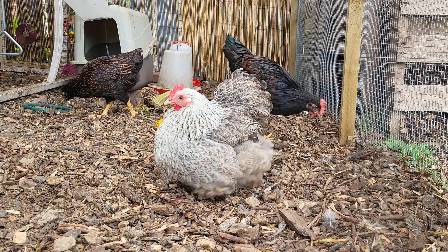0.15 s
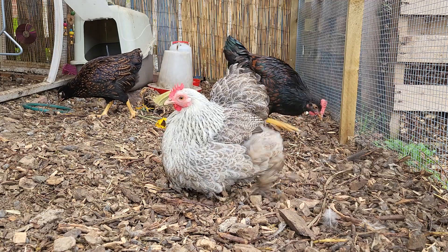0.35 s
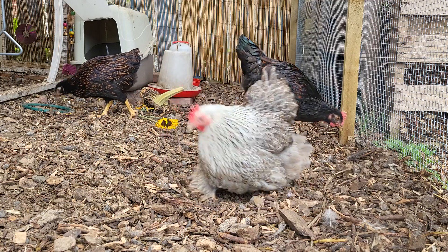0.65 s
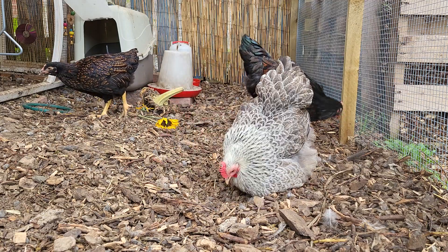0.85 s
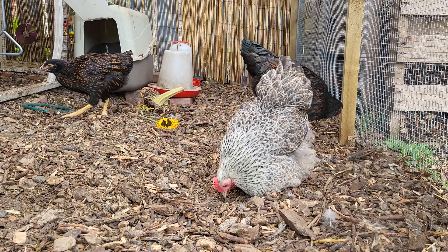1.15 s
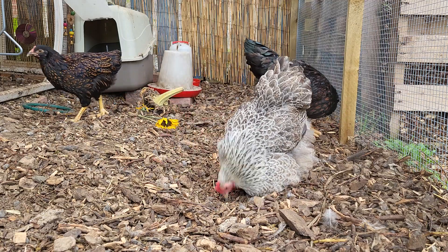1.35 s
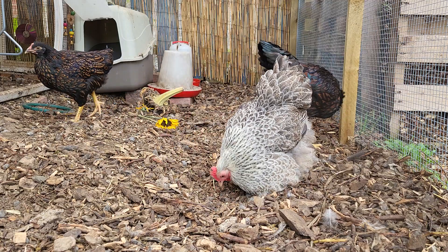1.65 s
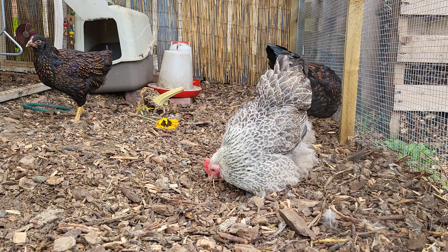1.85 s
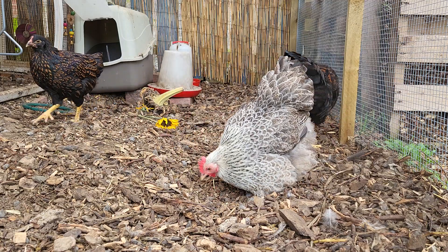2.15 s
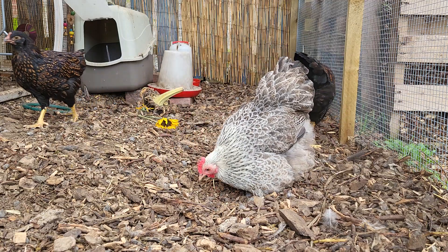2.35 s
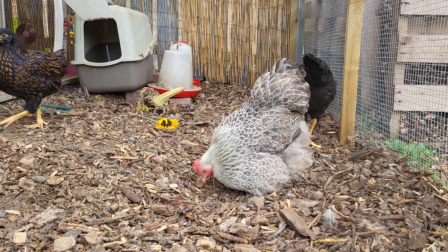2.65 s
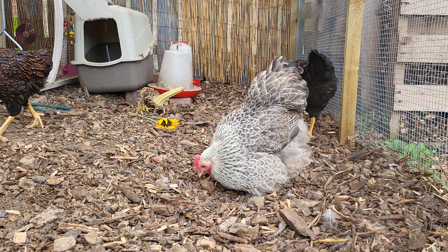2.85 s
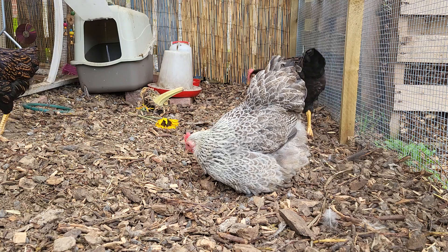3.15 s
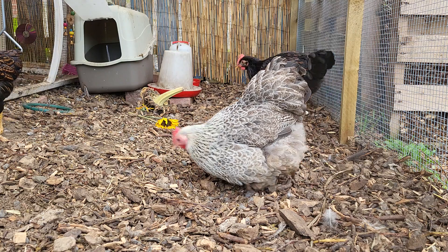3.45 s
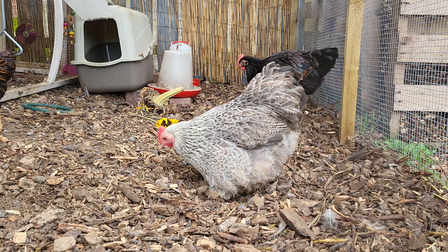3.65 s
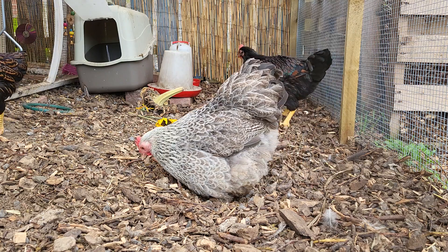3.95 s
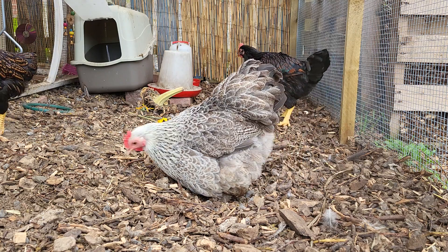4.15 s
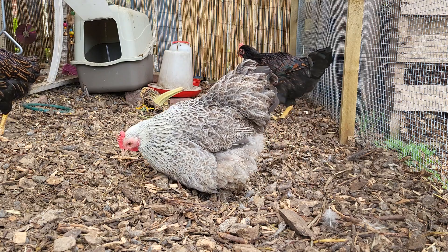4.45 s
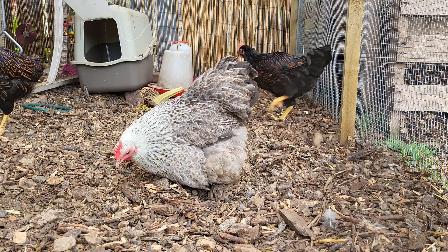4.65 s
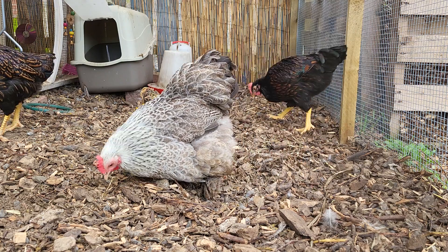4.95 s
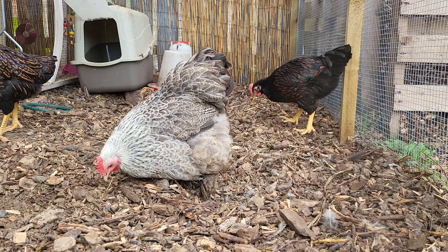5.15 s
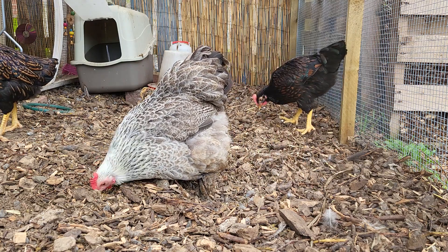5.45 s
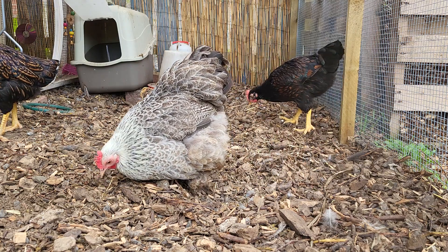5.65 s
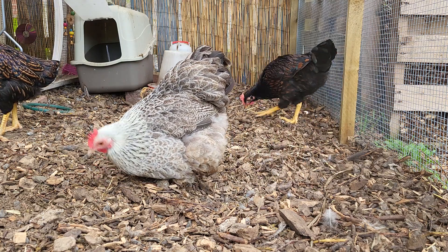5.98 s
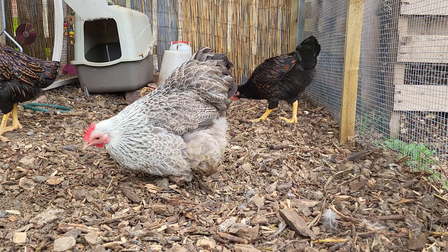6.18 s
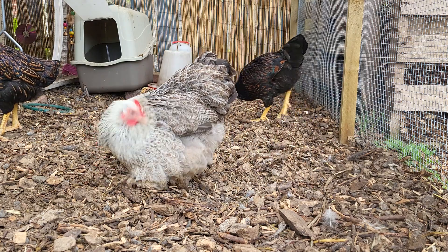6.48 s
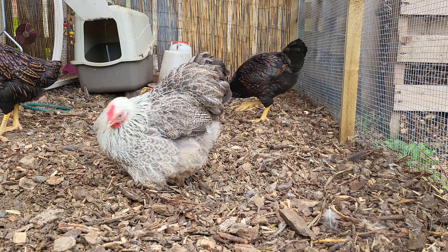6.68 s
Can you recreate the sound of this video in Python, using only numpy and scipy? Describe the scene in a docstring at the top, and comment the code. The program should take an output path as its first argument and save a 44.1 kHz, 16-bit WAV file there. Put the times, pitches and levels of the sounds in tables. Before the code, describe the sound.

Outdoors, a phone a metre or two from hens picks up crisp, bright wood-chip rustling and snapping just after the start. A calmer stretch follows with tiny soft clucks and thin shuffling off to the right. The loudest moment is a sudden claw scrape against wood with a deep bump, followed by scattered steps and scratches. Soft hum and far traffic rumble continue throughout.

```python
"""A steady transformer hum over distant traffic comes first, with a hen shuffling lightly further off to the right.
Then hens step and scratch in dry wood-chip litter a metre or two from a phone, and cluck softly now and then.
Coloured random clicks make the rustle, scrape and thud; short rings make the snapping chips; a kick shakes the run.
Sine waves make the hum and the clucks."""
import sys
import numpy as np
from scipy import signal
from scipy.fft import rfft, irfft, next_fast_len
from scipy.io import wavfile
from scipy.ndimage import uniform_filter1d

SR = 44100
rng = np.random.default_rng(int(sys.argv[2]) if len(sys.argv) > 2 else 0)


def master(y):
    """Save y as 16-bit WAV."""
    cut = np.clip(np.atleast_2d(y).T, -1, 1)
    pcm = np.round(cut * 32767)  # scale
    wavfile.write(sys.argv[1], SR, pcm.astype(np.int16))


def makeup_ratio(level_db):
    """Linear amplitude ratio for a level in decibels (20 dB per factor of ten)."""
    decades = np.asarray(level_db, float) / 20
    return 10 ** decades


N = 300757  # length in samples


def colour(x, shape):
    """Give a noise a spectrum of (f/Hz, level/dB) points, falling away outside them."""
    hz, db = np.transpose(shape)
    size = next_fast_len(N)
    log_f = np.log(np.arange(size // 2 + 1) * SR / size + 1)
    response = makeup_ratio(np.interp(log_f, np.log(hz), db, -80, -80))
    return irfft(rfft(x, size) * response, size)[..., :N]


def unit(x, lo_hz, hi_hz):
    """Scale two channels so that their mean has rms 1 in a band."""
    sos = signal.butter(4, [lo_hz, hi_hz], "band", fs=SR, output="sos")
    return x / signal.sosfilt(sos, x.mean(axis=0)).std()


def pan(db):
    """Left and right gains for a left minus right level difference."""
    return makeup_ratio(np.array([db / 2, -db / 2]))


def walk(rate):
    """Random levels held 1 / rate s and smoothed twice; spread near 1."""
    k = int(SR / rate)
    held = np.repeat(rng.standard_normal(N // k + 1), k)
    return 1.55 * uniform_filter1d(uniform_filter1d(held, k), k)[:N]


def grains(rate, spread_db, alike, lag):
    """Scattered clicks of uneven, bounded size, rate a second; both ports share some, the left lag samples late."""
    size = makeup_ratio(spread_db * np.minimum(rng.exponential(size=(3, N)), 4))
    clicks = (rng.random((3, N)) < rate / SR) * rng.standard_normal((3, N))
    both, left, right = clicks * size
    own = np.sqrt(1 - alike ** 2)
    return np.array([alike * np.roll(both, lag) + own * left, alike * both + own * right])


def power(s, db, rise_s, fall_s):
    """Power of each event, a row of millisecond values: straight rise and fall in dB, each time given per 20 dB."""
    late = np.arange(N * 1000 // SR + 2) / 1000 - np.reshape(s, (-1, 1))
    # a fall of zero or less ends the event within milliseconds
    fall_s = np.maximum(np.reshape(fall_s, (-1, 1)), 1e-3)
    below = np.where(late < 0, -late / rise_s, late / fall_s)
    return makeup_ratio(2 * (np.reshape(db, (-1, 1)) - 20 * np.minimum(below, 8)))


def gain(*powers):
    """Unrelated events add in power; one gain a sample."""
    total = np.sqrt(sum(p.sum(axis=0) for p in powers))
    return np.interp(np.arange(N) / SR, np.arange(len(total)) / 1000, total)


# transformer hum, mains harmonics: f/Hz, rms level/dB
HUM_HARMONICS = [(100, -44.5), (200, -63), (300, -75), (400, -75.5)]


def hum():
    """Transformer: mains harmonics as sines that waver slightly in level and phase."""
    t = np.arange(N) / SR
    total = np.zeros(N)
    for hz, db in HUM_HARMONICS:
        level = np.sqrt(2) * makeup_ratio(db + 0.86 * walk(4.0))
        total += level * np.sin(2 * np.pi * (hz * t + rng.random()) + 0.1 * walk(8.3))
    return total


# spectrum of far traffic rumble: f/Hz, level/dB per Hz
RUMBLE_SPECTRUM = [(15, -22), (25, -11.5), (40, -9), (60, -2), (80, -1), (120, -10.5), (160, -14),
                   (240, -19), (300, -36)]
# spectrum of far tyre roar: f/Hz, level/dB per Hz
ROAR_SPECTRUM = [(140, -33.5), (230, -8), (305, -10), (365, -13.5), (402, -15), (476, -17), (609, -18),
                 (756, -20), (922, -15.5), (1050, -17.5), (1150, -20.5), (2200, -37), (2860, -63.5),
                 (4840, -120)]
# spectrum of the smooth background hiss: f/Hz, level/dB per Hz
HISS_SPECTRUM = [(1290, -30), (2200, -2.5), (2510, -3.5), (3460, -5), (3730, -6.5), (7160, -9), (9020, -11),
                 (13000, -8), (15800, -6)]


def distance():
    """Dense noise: traffic rumble nearly alike at both ports, tyre roar and a smooth hiss that are not."""
    rumble = unit(colour(grains(SR, 0, 0.97, lag=0), RUMBLE_SPECTRUM), 18, 300)
    roar = unit(colour(grains(SR, 0, 0.44, lag=0), ROAR_SPECTRUM), 270, 2200)
    hiss = unit(colour(grains(SR, 0, .05, lag=0), HISS_SPECTRUM), 1900, 15000)
    rumble = rumble * makeup_ratio(-53.5 + 2.2 * walk(3.03)) * pan(1.5)[:, None]
    roar = roar * makeup_ratio(-70 + 1.1 * walk(8.9))
    hiss = hiss * makeup_ratio(-83.5 + 0.44 * walk(5.1))
    return rumble + roar + hiss


# spectrum of chips heard from further off: f/Hz, level/dB per Hz
FAR_CHIP_SPECTRUM = [(2350, -37), (4000, -10), (6450, -3), (7570, 1.5), (8740, -11.5), (15200, -9.5),
                     (15800, -4)]
# a hen further off, shuffling lightly: t/s of peak, level/dB, t/s to fall 20 dB
FAR_STEPS = [(0.044, -73.5, 0.7), (.1, -85, 2), (.185, -68, .03), (1.0, -100, 5), (4.19, -94, -1),
             (4.495, -80, 1.7), (5.35, -80, -0.05), (1.316, -81, 0.3), (1.41, -81.5, 0.25),
             (1.57, -76.5, .17), (1.8, -88.5, 0.4), (1.944, -76.5, .14), (2.26, -82, .5), (2.374, -77, 0),
             (3.1, -80.5, .4), (3.352, -81, 0.8), (3.42, -86, .9), (4.336, -82, .1), (5.64, -76.5, 0.1),
             (5.802, -79.5, 0.37), (5.99, -80.5, 0.7), (6.203, -77.5, 0.2), (6.45, -90.5, 1.37),
             (6.62, -76.5, 0.1), (6.7, -83.5, 0.2)]


def shuffle():
    """Far hen, to the right: distance leaves only a thin bright whisper of the chips."""
    far = unit(colour(grains(12000, 1.7, 0.31, lag=12), FAR_CHIP_SPECTRUM), 4300, 10500)
    s, db, fall_s = np.transpose(FAR_STEPS)
    return far * gain(power(s, db, 0.083, fall_s)) * pan(-5)[:, None]


def loose_snaps():
    """Chips that snap at random, each as loud as the rustle around it allows and with a pitch of its own."""
    when, size, pitch, side = rng.random((600, 4)).T
    rustle_db = 20 * np.log10(footwork()[0][(when * N).astype(int)])
    # above -52 dB a louder rustle brings no louder snaps
    db = np.minimum(rustle_db, -52) + 11 - 3 * np.log(size + .05)
    ring_hz = 3500 * (9000 / 3500) ** pitch
    return np.transpose([when * N / SR, db, -5 * side, ring_hz])


# single chips snapping near the phone: t/s, level/dB, left minus right level/dB, ring f/Hz
SINGLE_SNAPS = [(0.0423, -52, -5.0, 6790), (0.1421, -55, -5.0, 6200), (0.166, -41, -5.5, 7360),
                (0.2543, -47, -4.5, 8330), (0.2763, -47, -3.0, 6610), (0.3536, -35, -1.0, 7680),
                (0.4075, -34, -2.5, 4830), (0.4284, -36, -2.5, 6990), (0.4524, -36, -2.0, 7850),
                (0.4694, -38, -4.0, 7250), (0.5501, -34, -3.0, 5350), (0.5586, -38, -2.0, 6730),
                (0.5881, -40, 0.0, 7830), (0.6739, -28, -3.0, 6780), (0.7502, -33, -2.5, 5070),
                (0.7846, -36, -1.0, 7200), (0.7974, -37, -2.0, 7020), (0.8204, -37, -1.0, 7430),
                (2.688, -51, 0, 2100), (2.6958, -49, -2.5, 5560), (2.733, -52, 0, 2300),
                (2.741, -54, 0, 2400), (2.7781, -44, -3.0, 5990), (3.3508, -60, -7.0, 6720),
                (3.5623, -42, -1.5, 7360), (3.6007, -30, -2.5, 6610), (3.9165, -40, -2.5, 6780),
                (4.5401, -44, -3.5, 7060), (4.5715, -38, -5.0, 7260), (4.8894, -41, -2.0, 6080),
                (5.0274, -39, -5.0, 5650), (5.0345, -32, 0.0, 6810), (5.1028, -49, -2.5, 3020),
                (5.1362, -40, -2.0, 4020), (5.6381, -59, -4.0, 7250), (5.8027, -57, -6.5, 6960)]


def snaps(ring_cycles=1.5, tail_s=.002, tail_db=-22, lag=6):
    """A click that rings a few cycles and leaves a short tail of splinters near the same pitch."""
    out, t = np.zeros((2, N + 2048)), np.arange(512) / SR
    rows = np.vstack([SINGLE_SNAPS, loose_snaps()])
    chance = rng.standard_normal((len(rows), len(t)))
    for (s, db, pan_db, hz), noise in zip(rows, chance):
        decay = np.exp(-t * hz / ring_cycles)
        attack = 1 - np.exp(-t / .00005)
        ring = np.sin(2 * np.pi * hz * t) * decay * attack
        splinters = np.convolve(noise * np.exp(-t / tail_s), ring * np.exp(-t / .0001))[:len(t)]
        snap = ring / np.abs(ring).max() + makeup_ratio(tail_db) * splinters
        for channel, share in enumerate(pan(pan_db)):
            i = int(s * SR) + (lag if channel == 0 else 0)  # the left port hears it lag samples late
            out[channel, i:i + len(t)] += makeup_ratio(db) * share * snap
    return out[:, :N]


# feet landing on the chips, a sudden start:
# t/s, chips level/dB, t/s to fall 20 dB, claws level/dB, left minus right level/dB
FOOT_LANDINGS = [(.278, -67, 0.3, -90, -2), (.628, -55.5, 0.21, -66.5, -1), (3.597, -45.5, .2, -62.5, 1.5),
                 (3.84, -50, 0.06, -54.5, 2), (3.913, -53.5, 0.13, -57.5, -1), (4.54, -61.5, 0.42, -72, -3),
                 (.408, -52.5, 0.32, -66.5, -2), (.55, -56, 0.03, -77, -2), (0.675, -52.5, 0.08, -67, 0),
                 (.785, -59.5, 0.1359, -67, 3), (2.728, -71, 0.13, -73, 5), (2.78, -70.5, 0.2, -94, -2),
                 (3.704, -36, 0.08, -69, -8), (4.101, -65, 0.09, -80.5, -2), (4.803, -42.5, .06, -52, 0),
                 (5.032, -49, .06, -62.5, 0.5)]
# feet pushed through the chips, swelling to a peak:
# t/s of peak, chips level/dB, t/s to fall 20 dB, claws level/dB, left minus right level/dB
FOOT_DRAGS = [(0.351, -53.5, 0.3059, -65.5, 0), (.46, -61, 0.22, -85, -2), (.59, -56.5, 0.0644, -72, -1),
              (.735, -74, .1, -76, 0), (0.818, -53.5, 0.0758, -67, -0.5), (2.701, -66, 0.14, -70, -1),
              (3.57, -57, .2, -74, 0), (3.633, -48, 0.1, -56.5, -7), (3.744, -37.5, 0.11, -38, -1.5),
              (3.962, -48, 0.03, -47, -3), (3.985, -56, .06, -56, -2), (4.055, -63.5, -0.14, -64.5, 3),
              (4.69, -56, .2, -68, -1), (4.584, -48, 0.3053, -66.5, -3), (4.626, -47, .1, -64, -0.5),
              (4.76, -58.5, 0.18, -69.5, -1), (4.909, -58, 0.1951, -62.5, -1), (4.99, -69, 0.2, -80, -3.5),
              (5.135, -60, .1, -63, -.5), (5.165, -60, .06, -64, -1), (5.21, -66.5, 0.11, -74, -1),
              (5.277, -67, 0.09, -75, 0)]
# claws striking hard against wood:
# t/s, chips level/dB, claws level/dB, hollow wood level/dB, share of woody knock (0-1)
CLAW_KICKS = [(3.711, -42, -31.5, -48.5, .24), (3.719, -40, -28, -42.5, .1), (3.73, -39, -22.5, -36.5, .1),
              (4.795, -42, -34, -52, 0.69)]


def footwork():
    """Gains of chips, rasp, knock, wood and bark, and of the two sides, out of steps, drags and kicks."""
    step, drag = np.transpose(FOOT_LANDINGS), np.transpose(FOOT_DRAGS)
    kick_s, thrown_db, strike_db, wood_db, share = np.transpose(CLAW_KICKS)
    share = share[:, None]
    chips, claws = [], []
    for (s, chip_db, fall_s, claw_db, _), rise_s in [(step, 0.0058), (drag, 0.046)]:
        settling = power(s, chip_db - 15, rise_s, .12)  # chips settling after every foot
        chips.append(power(s, chip_db, rise_s, fall_s) + settling)
        claws.append(power(s, claw_db, rise_s, 1.2 * fall_s))  # claws outlast the chips
    claws = np.vstack(claws)

    # a kick throws chips, then a weaker scatter settles slowly
    thrown = power(kick_s, thrown_db, .006, .06) + power(kick_s, thrown_db - 13, .006, 0.24)
    strike = power(kick_s, strike_db, .006, .085)
    tail = power(kick_s, strike_db - 19.5, .006, .17)
    loud = gain(*chips, thrown)

    # the loudest foot decides the side: a power-weighted mean of the left gains
    step_left = chips[0] * makeup_ratio(step[4])[:, None]
    drag_left = chips[1] * makeup_ratio(drag[4])[:, None]
    left = gain(step_left, drag_left, thrown * makeup_ratio(-3)) / loud

    knock_share = .15  # of the power of claws and kick tails
    scrape = (claws.sum(axis=0) + tail.sum(axis=0))[None]
    rasp = gain((1 - knock_share) * scrape, (1 - share) * strike)
    knock = gain(knock_share * scrape, share * strike)

    # a dull kick booms on in the hollow wood, a knocking one rattles loose bark, as the claws of every foot do
    boom = power(kick_s + .012, wood_db, .015, 0.31)
    wood = gain((1 - share) * boom)
    bark = gain(share * boom, claws * makeup_ratio(2 * -3.5))
    return loud, rasp, knock, wood, bark, np.array([left, 1 / left])


# spectrum of dry chips close by: f/Hz, level/dB per Hz
CHIP_SPECTRUM = [(880, -46.5), (1500, -11), (1740, -18), (2140, -9), (2490, -13.5), (2970, -2.5),
                 (7030, 3.5), (7840, -2.5), (9010, -9), (15100, -6), (16000, -11)]


def chips(chips_gain):
    """Chips rubbing: many small clicks hiss as they slide, fewer and more uneven ones tick."""
    slide = unit(colour(grains(20000, 1.45, 0.21, lag=9), CHIP_SPECTRUM), 2500, 14000)
    tick = unit(colour(grains(1200, 3, .7, lag=12), CHIP_SPECTRUM), 3000, 9000)
    tick_share = 0.29  # of the power
    rustle = np.sqrt(1 - tick_share) * slide + np.sqrt(tick_share) * tick
    return rustle * chips_gain * makeup_ratio(1.2 * walk(150))


# spectrum of claws rasping: f/Hz, level/dB per Hz
RASP_SPECTRUM = [(530, -43), (900, -16.5), (1200, -17.5), (1500, -10), (1970, -5), (2130, -6), (2590, -8.5),
                 (4500, -16), (5850, -43), (9900, -120)]
# spectrum of claws knocking: f/Hz, level/dB per Hz
KNOCK_SPECTRUM = [(650, -50.5), (1100, -19.5), (1310, -17.5), (1670, 1.5), (2060, -3.5), (2290, -13.5),
                  (2800, -10), (3640, -41), (6160, -120)]


def claws(rasp_gain, knock_gain):
    """Claws catching: dense clicks rasp, sparser ones knock."""
    rasp = unit(colour(grains(8000, 1.1, 0.4, lag=7), RASP_SPECTRUM), 1200, 3000)
    knock = unit(colour(grains(3000, 1.2, 0.61, lag=6), KNOCK_SPECTRUM), 1200, 3000)
    return (rasp * rasp_gain + knock * knock_gain) * makeup_ratio(0.61 * walk(90))


# spectrum of hollow wood booming: f/Hz, level/dB per Hz
WOOD_SPECTRUM = [(94, -40.5), (160, -10.5), (337, -5.5), (446, 0), (623, -3), (674, -11), (1100, -13.5),
                 (1300, -19), (1690, -46.5), (2860, -120)]
# spectrum of loose bark rattling: f/Hz, level/dB per Hz
BARK_SPECTRUM = [(140, -36.5), (230, -7), (368, -2.5), (405, -2), (770, -6), (1500, -8), (1950, -36),
                 (3300, -120)]


def shaken_wood(wood_gain, bark_gain):
    """Clicks coloured by the wood: the hollow parts boom, loose bark rattles."""
    wood = unit(colour(grains(8000, 1.0, 0.56, lag=3), WOOD_SPECTRUM), 320, 970)
    bark = unit(colour(grains(4000, 1.5, 0.69, lag=3), BARK_SPECTRUM), 230, 900)
    return wood * wood_gain + bark * bark_gain


# spectrum of ground and air thudding: f/Hz, level/dB per Hz
THUD_SPECTRUM = [(20, -13), (45, 0.5), (70, -2), (125, -1), (170, -17.5)]
# ground and air thudding at the microphone: t/s of peak, level/dB, t/s to fall 20 dB
GROUND_THUDS = [(.38, -57, .5), (.48, -60, -0.4), (2.348, -45, .25), (3.74, -49, .5), (3.812, -35, 0.09),
                (3.87, -41.5, 0.33), (4.03, -48, 0)]


def thuds():
    """Ground and air thudding at the microphone: deep noise that swells and fades."""
    thud = unit(colour(grains(8000, 1.1, .9, lag=0), THUD_SPECTRUM), 25, 70)
    s, db, fall_s = np.transpose(GROUND_THUDS)
    return thud * gain(power(s, db, 0.047, fall_s))


def litter():
    """Near feet: chips and claws on the side of the foot, wood and ground below them."""
    chips_gain, rasp_gain, knock_gain, wood_gain, bark_gain, side = footwork()
    high = chips(chips_gain) + claws(rasp_gain, knock_gain)
    low = shaken_wood(wood_gain, bark_gain) + thuds()
    # low sounds roll in lumps rather than fading evenly
    return high * side + low * makeup_ratio(1.5 * walk(40))


# soft clucks and squeaks: t/s, length t/s, pitch f/Hz, level/dB, roughness (no unit)
CLUCK_NOTES = [(2.0, .14, 560, -72, .9), (2.153, .035, 940, -60, .4), (2.158, .045, 1885, -66, .2),
               (2.192, .022, 935, -63, .6), (2.65, .035, 1775, -67, .15), (2.912, .06, 1055, -68, .3),
               (3.678, .02, 5800, -49, 1.8), (3.93, .06, 600, -53, .3), (5.132, .018, 3950, -62, .7),
               (5.205, .05, 1035, -58, .15), (5.272, .03, 3930, -66, .5)]


def clucks():
    """Closed-beak notes: two partials, quick start, fade, sagging pitch; rough ones flutter in level and pitch."""
    out, flutter, wobble = np.zeros(N), walk(150), walk(500)
    for s, length, hz, db, rough in CLUCK_NOTES:
        i = int(s * SR)
        u = np.arange(int(length * SR)) / (length * SR)  # 0 to 1 along the note
        note = slice(i, i + len(u))
        pitch = hz * (1 - .015 * (u - .4) + .03 * rough * wobble[note])
        phase = 2 * np.pi * np.cumsum(pitch) / SR
        shape = np.sin(np.pi * u ** .5) ** .7 * makeup_ratio(3 * rough * flutter[note])
        out[note] += makeup_ratio(db) * shape * (np.sin(phase) + makeup_ratio(-21) * np.sin(2 * phase))
    return out


# the right port hears more treble of the litter: f/Hz, level/dB
RIGHT_TREBLE = [(10, -3), (3000, -1), (8000, 1.5), (16000, 3.5), (22000, 4.5)]


def scene():
    """All sources at the two microphone ports."""
    background = hum() * pan(0.46)[:, None] + distance()
    left, right = shuffle() + snaps() + litter()
    feet = np.array([left, colour(right, RIGHT_TREBLE)])
    return background + feet + clucks()


def top_cut(x):
    """Nothing passes above the cut-off."""
    return signal.sosfilt(signal.butter(12, 16190, fs=SR, output="sos"), x)


def record(dry):
    """The phone cuts the top above 15900 Hz with a steep low-pass."""
    low_pass = signal.ellip(8, .2, 70, 15900, fs=SR, output="sos")
    mix = signal.sosfilt(low_pass, dry)
    return top_cut(mix)


dry = scene()
out = record(dry)
master(out)
```